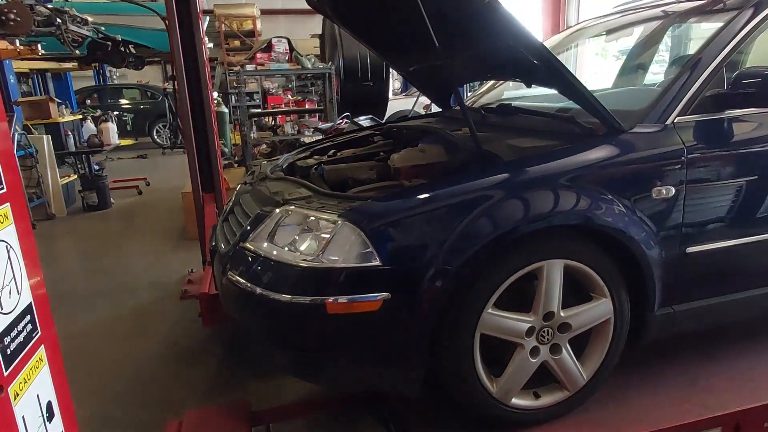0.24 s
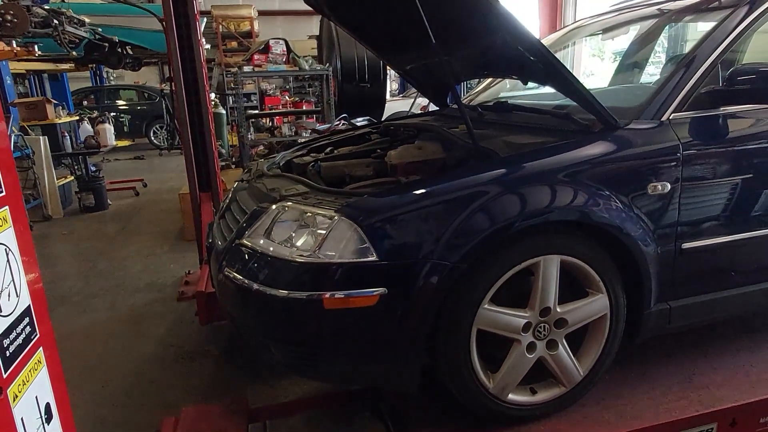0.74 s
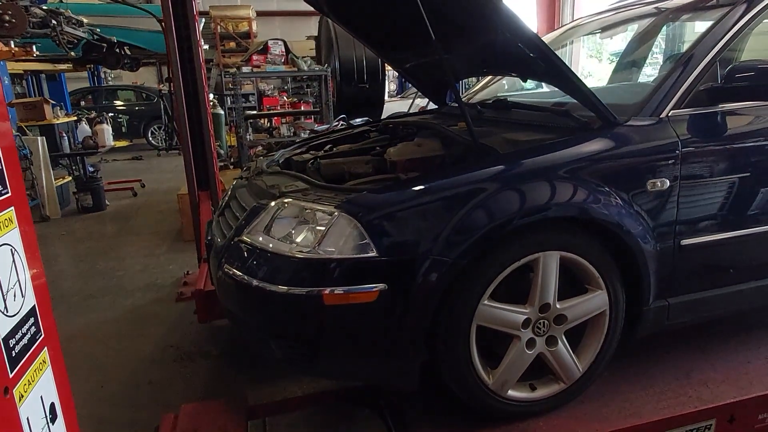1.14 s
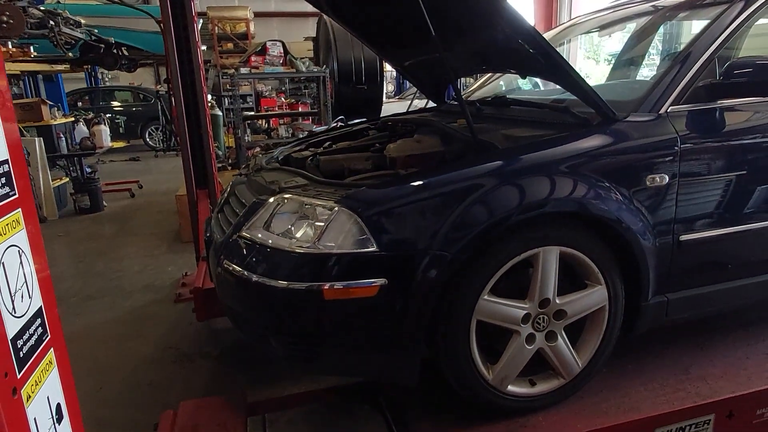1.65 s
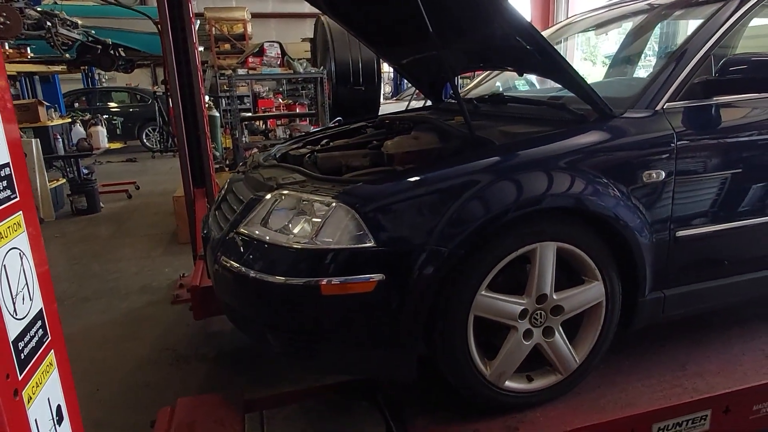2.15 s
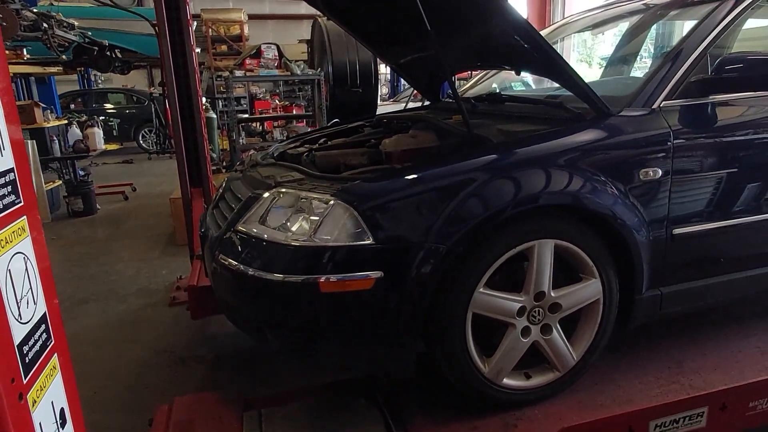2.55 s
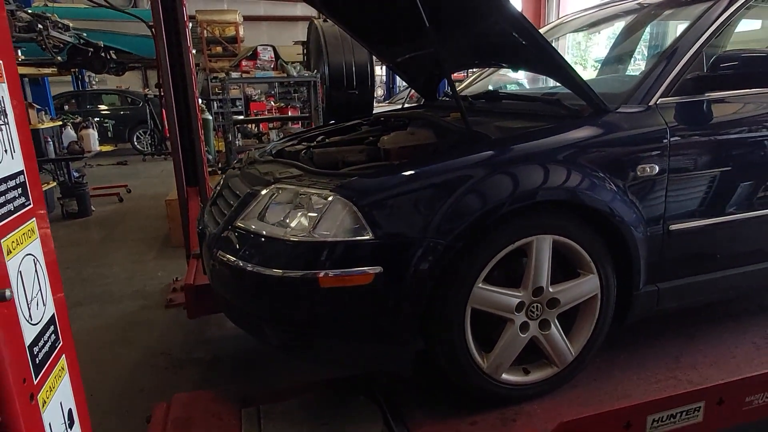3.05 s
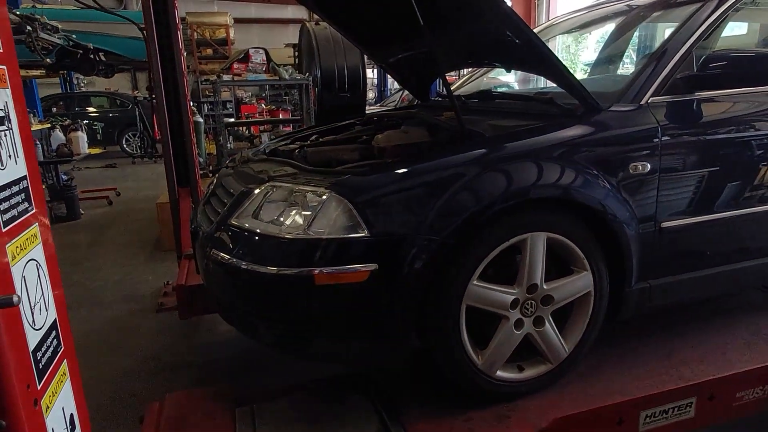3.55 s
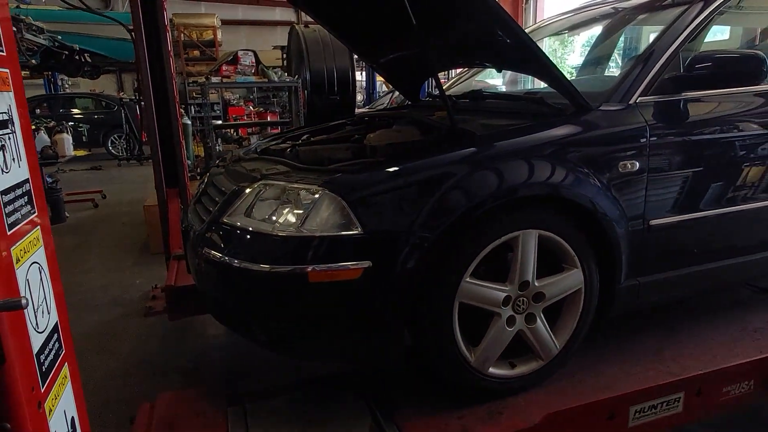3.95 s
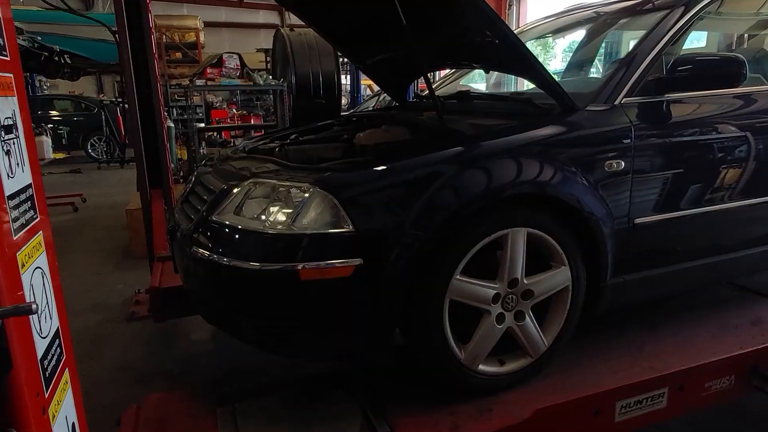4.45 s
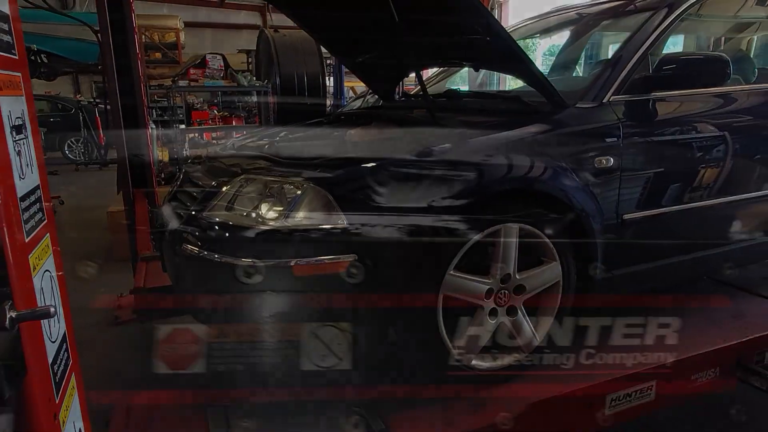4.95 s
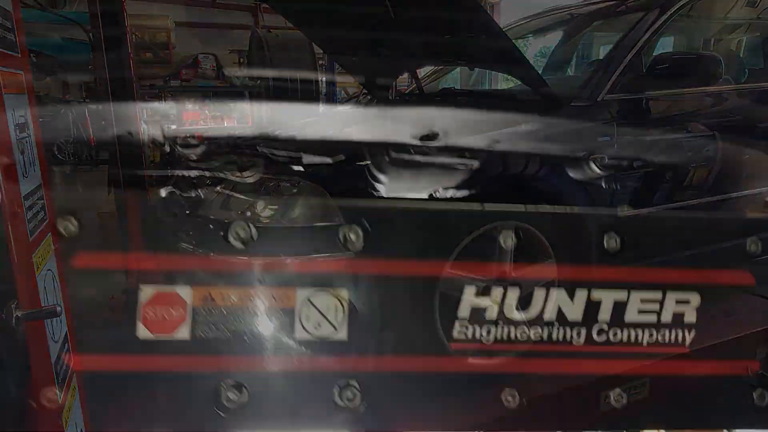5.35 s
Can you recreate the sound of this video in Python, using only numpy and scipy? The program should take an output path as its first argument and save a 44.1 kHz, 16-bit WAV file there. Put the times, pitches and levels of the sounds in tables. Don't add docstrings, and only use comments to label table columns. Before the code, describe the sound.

A loud, piercing hydraulic pump whine holds steady in a garage, then cuts abruptly to faint clicks and soft, low wind-like buffeting.

```python
import sys
import numpy as np
from scipy import signal
from scipy.fft import rfft, irfft, next_fast_len
from scipy.io import wavfile
from scipy.ndimage import map_coordinates

SR = 44100
rng = np.random.default_rng(int(sys.argv[2]) if len(sys.argv) > 2 else 0)


def field_ratio(decibels):
    return 10 ** (np.asarray(decibels, dtype=float) / 20)


def generate_wav(sig):
    pcm = np.round(np.clip(np.atleast_2d(sig).T, -1, 1) * 32767).astype(np.int16)
    wavfile.write(sys.argv[1], SR, pcm)


N = 246519
SIZE = next_fast_len(N)
TEETH = 13
PORT_LEAD_S = 23 / SR
time = np.arange(N) / SR


def curve(table, at=time):
    s, *columns = np.transpose(table)
    return [np.interp(at, s, c) for c in columns]


def band(hz, width_hz):
    f = np.fft.fftfreq(SIZE, 1 / SR)
    near = np.flatnonzero(abs(f - hz) < 4 * width_hz + 1)
    bell = np.exp(-0.5 * ((f[near] - hz) / width_hz) ** 2)
    bins = np.zeros(SIZE, complex)
    bins[near] = bell * np.exp(2j * np.pi * rng.random(len(near)))
    return np.fft.ifft(bins)[:N] * SIZE / np.sqrt(np.sum(abs(bins) ** 2))


def two_ports(table, alike_hz, modes=()):
    f = np.fft.rfftfreq(SIZE, 1 / SR) + 1
    hz, *ports_db = np.transpose(table)
    common, *own = rfft(rng.standard_normal((3, SIZE))) * np.sqrt(SR / 2)
    share = 1 / (1 + (f / alike_hz) ** 2)
    out = []
    for port, db in enumerate(ports_db):
        earlier = np.exp(2j * np.pi * f * PORT_LEAD_S * (1 - port))
        mix = np.sqrt(share) * common * earlier + np.sqrt(1 - share) * own[port]
        colour_db = np.interp(np.log(f), np.log(hz), db)
        for mode_hz, width_hz, *gains_db in modes:
            colour_db = colour_db + gains_db[port] * np.exp(-0.5 * ((f - mode_hz) / width_hz) ** 2)
        out.append(irfft(mix * field_ratio(colour_db), SIZE)[:N])
    return np.array(out)


def tooth_hz():
    final_hz, creep_hz, settle_s = 766.72, 0.52, 2.6
    return final_hz - creep_hz * np.exp(-time / settle_s)


def wander(knots, count, rate_hz):
    slide = rate_hz * rng.standard_normal((2, count)) * knots[:, None, None]
    path = np.exp(2j * np.pi * (slide + rng.random((2, count))))
    return (path[:, 0] + 0.5 * path[:, 1]) / np.sqrt(1 + 0.39 ** 2)


def echo_paths(knots, echoes, depth, spread):
    paths = 1
    for echo, null_s, rate_hz in echoes:
        turns = (knots - null_s) * rate_hz + spread
        paths = paths - np.clip(echo, 0, 1) * depth * np.exp(2j * np.pi * turns)
    return paths


# [multiple, level/dB, platform echo share 0-1, echo cancels t/s, fades f/Hz]
LEFT_PARTIALS = [(1, -39, 0.22, 6.5, 0.193), (2, -44, 0.28, 4.5, 0.288), (3, -44, 1, 2.5, 0.535),
                 (4, -48, 0.57, 2, 0.219), (5, -45.5, 0.56, 5, 0.288), (6, -34.26, 0.98, 0.7, 0.008),
                 (7, -31.45, 1, 0.9, 0.0124), (8, -21.5, 1, 0.74, 0.011), (9, -38, 0.5, -1.34, 0.134),
                 (10, -30.5, 1.0, 5, 0.0254), (11, -52, 1.0, 4.5, 0.251), (12, -43, 0.66, 3, 0.11),
                 (13, -46.5, 0.6, 4, 0.28), (14, -40, 0.64, 2, 0.061), (15, -42.5, 1.0, 2.5, 0.1),
                 (16, -36.5, 0.7, 3, 0.22), (17, -33, 0.48, 1.2, 0.23), (18, -27, 0.93, 0.5, 0.022),
                 (19, -36, 0.2, 2.3, 0.36), (20, -55, 0.77, 4, -0.34)]
# [multiple, level/dB, platform echo share 0-1, echo cancels t/s, fades f/Hz]
RIGHT_PARTIALS = [(1, -40.0, 0.4, -5.5, 0.157), (2, -32.5, 0.47, -1.06, 0.063), (3, -43, 1.0, 9, 0.069),
                  (4, -46, 0.43, 5, -0.39), (5, -43.5, 1, 3, 0.11), (6, -47.5, 0.41, 1, -0.2),
                  (7, -29, 0.66, 1.25, 0.028), (8, -47, 0.72, 1, -0.51), (9, -61, 0.2, 6, 0.67),
                  (10, -51.5, 0.82, 6, -0.36), (11, -52.5, 0.81, 1.9, -0.11), (12, -38, 0.61, -2, 0.154),
                  (13, -44, 0.6, 3, 0.5), (14, -51.22, 0.44, 2, -0.34), (15, -30, 0.84, 3.5, -0.0087),
                  (16, -47.5, 1.0, 3.5, 0.402), (17, -50.32, 0.42, 5, -0.091),
                  (18, -44.5, 0.61, 4.5, -0.31), (19, -32.3, 0.8, 6, -0.0072), (20, -53, 0.83, 3, -0.176)]
# [left share 0-1, cancels t/s, fades f/Hz, right share 0-1, cancels t/s, fades f/Hz]
BODY_ECHO = [(0.27, 3, -0.26, 0.3, 3, -0.27), (0.35, 3, -0.28, 0.53, 4, -0.109),
             (0.84, 1.3, 0.52, 0.28, 0.37, 0.422), (0.23, 2.6, -0.356, 0.54, 3.5, 0.17),
             (0.84, 1.74, -0.15, 0.51, 0.65, 0.239), (0.13, 1.05, -0.232, 0.52, 1.1, 0.24),
             (0.034, -0.2, -0.62, 0.35, 1.64, -0.049), (0.077, 1.36, -0.1, 0.68, 3.5, 0.26),
             (1.0, 3.5, 0.04, 0.91, 3, -0.26), (0.31, 9, 0.093, 0.98, -1.35, -0.327),
             (0.53, 5.5, -0.57, 0.56, 3, 0.361), (0.31, 0.4, -0.48, 0.28, -1.5, -0.543),
             (0.25, 5, 0.72, 0.57, 4.5, -0.5), (0.11, -2, -0.1, 0.48, 5.5, 0.45),
             (0.66, 0.94, -0.26, 0.018, 2.5, -0.4), (0.1, 4.79, -0.486, 0.61, 5.5, -0.23),
             (0.69, 0.7, -0.33, 0.17, 1.31, 0.78), (0.16, 5.5, 0.12, 0.64, 2.5, 0.49),
             (0.66, 3.5, -0.45, 0.08, -0.0, -0.59), (0.4, 4, 0.4, 1.0, 0, 0.343)]
LEAD = [-1, -3.87, 0.59, -3, -2.5, -3.5, -0.6, -1.5, 2.14, -0.2, 0.5, -0.3, 0.36, -1.6, -2.5, -1.6, -4,
        -1.3, -2.5, 0]
# [2 below level/dB, 1 below level/dB, 1 above level/dB, 2 above level/dB]
NEAR_LEFT = [(-59, -55, -88, -56.5), (-68, -58, -51, -51), (-57.7, -64, -53.5, -56.5), (-70, -75, -70, -62),
             (-70, -69, -61, -44), (-79, -83, -66, -65), (-60, -60, -63, -57), (-59, -46, -48, -48.5),
             (-52, -42, -45.5, -58), (-44, -45, -40.5, -43), (-53, -55, -62, -53), (-56, -61, -41, -54.8),
             (-56.8, -52, -50, -48.5), (-63, -62, -60, -51), (-53.7, -45, -49, -51),
             (-46.5, -51, -42.5, -39.5), (-42.5, -52.5, -52, -40), (-51, -55, -54.6, -46.9),
             (-49, -49, -53, -52), (-61.3, -63, -66.9, -63.8)]
# [2 below level/dB, 1 below level/dB, 1 above level/dB, 2 above level/dB]
NEAR_RIGHT = [(-60.9, -66, -85, -58), (-64.8, -67.6, -63, -62), (-52, -50, -43.5, -49),
              (-62.5, -70, -60, -56), (-57, -51, -66, -50), (-76, -69, -60, -60.5), (-60.3, -66, -64, -64),
              (-59, -56, -50.5, -45), (-64.0, -59.9, -51, -66), (-61.4, -54, -55, -56),
              (-54.7, -48, -48, -53), (-41, -43, -55.5, -51.5), (-48, -46, -47, -59),
              (-61, -60.6, -48, -56), (-60, -58, -57, -54), (-57.0, -60, -64, -53),
              (-62.4, -62.6, -66, -49), (-57.8, -56, -60, -49), (-57, -56.7, -59, -55),
              (-57.4, -62, -64.3, -61.0)]
WAVER = [(-0.2, -0.3, -0.4, 5), (1, 6, -2.2, 2.5), (0.6, 3.5, -0.5, 3), (3.2, 0.5, 2.5, -1.2),
         (4.5, 1.2, 3.5, 2.3), (3, 2.8, 1.3, 4.5), (3, 9.5, 1.5, 2.5), (4, 7, 3.5, -0.3), (-2, 2, 0.2, 4.5),
         (6.5, 5, 3.0, 0.5), (2.3, 2, 0.2, 7.5), (-2.5, 8.5, 2.7, -1.5), (1, 2.7, 1, 4), (-2, 4, 1.5, 1),
         (4, 1.5, 4.5, 9), (2, 3.5, 2, 5.5), (3.5, 4, 4, 6), (5, 4.5, -3, 2), (4, 3, 0, 4),
         (-4, -1, 3.2, 3.2)]
# [below left level/dB, below right level/dB, above left level/dB, above right level/dB]
SKIRTS = [(-66.5, -72, -79, -75), (-69, -75, -60.5, -53), (-63, -70, -60, -62), (-61, -66.5, -74, -65),
          (-70, -60, -74.5, -73), (-68, -74.1, -71, -57), (-62, -65, -69, -71), (-58, -65, -63.5, -62),
          (-65.4, -74, -62, -75), (-60.5, -79, -55.5, -66), (-65, -65, -68.5, -72),
          (-69.9, -70.0, -61, -61), (-59.2, -54, -62, -55), (-58, -61, -68, -65.3),
          (-62, -60, -58.5, -62.7), (-55, -62, -58, -71), (-52, -67.7, -49, -68.0),
          (-57.9, -71, -61, -69.1), (-63.4, -68, -73.5, -72.4), (-78.2, -74.4, -77.4, -72.5)]
# [shaft multiple, left level/dB, right level/dB]
PANELS = [(34.0, -65, -57), (36.0, -56, -51.5), (60.0, -60.5, -48.5), (69.8, -69, -55),
          (87.0, -52.5, -50.5), (87.6, -62, -52), (99, -51, -57), (108.6, -51, -51), (116.4, -61, -64.7),
          (133.0, -44.5, -69), (136, -47, -66), (177.0, -50, -54), (184, -53, -55.6), (188.0, -57.1, -67),
          (199, -53.1, -55), (200.0, -56.3, -61), (207, -54.0, -59), (233, -51, -67), (244.0, -56.7, -65.1)]


def shaft_lines(knots, shaft_hz, turn_size, skirt_db=2.0, loose=0.6, scatter_db=0.8):
    away = np.arange(-6, 7)
    distance = abs(away)
    close = distance <= 2
    slip_hz = 120 - 2 * shaft_hz.mean()
    start = np.exp(2j * np.pi * rng.random(len(LEFT_PARTIALS)))
    angle = 2 * np.pi * rng.random()
    lines = np.zeros((2, len(knots), turn_size // 2 + 1), complex)
    for k, skirt in enumerate(SKIRTS):
        order = (k + 1) * TEETH + away
        below_db, above_db = np.reshape(skirt, (2, 2, 1))
        ports_db = np.where(away < 0, below_db, above_db) + skirt_db + scatter_db * rng.standard_normal(TEETH)
        ports_db[:, [4, 5, 7, 8]] = NEAR_LEFT[k], NEAR_RIGHT[k]
        for multiple, *panel_db in PANELS:
            ports_db[:, order == np.round(multiple)] = np.array(panel_db)[:, None]
        share = np.where(distance == 2, np.clip((k + 1) / 15, 0, 0.9), 0)
        beat = np.exp(2j * np.pi * slip_hz * knots * np.sign(away))
        ripple = np.sqrt(1 - share) + np.sqrt(share) * beat
        drift = wander(knots[:, 0], TEETH, rate_hz=0.069)
        steadiness = np.where(close, 1 + loose * drift, drift)
        side = ripple * steadiness * np.exp(1j * away * angle) * start[k]
        scatter = 0.8j * ~close * rng.standard_normal(TEETH)
        lead = np.exp(2j * np.pi * away * shaft_hz[0] * PORT_LEAD_S + scatter)
        depth = np.where(away == 0, 1, np.clip((k + 1) / 8.64, 0, 1))
        spread = np.where(close, 0.025, 0.059) * away
        for port, partial in enumerate((LEFT_PARTIALS[k], RIGHT_PARTIALS[k])):
            _, level_db, *platform = partial
            body = np.reshape(BODY_ECHO[k], (2, 3))[port]
            paths = echo_paths(knots, (platform, body), depth, spread)
            first, second = np.reshape(WAVER[k], (2, 2))[port]
            waver = np.exp(0.5j * np.where(distance == 1, first, second) * close)
            faded = side * paths
            faded = waver * faded / np.sqrt(np.mean(abs(faded) ** 2, axis=0))
            later = np.exp(-1j * port * LEAD[k])
            lines[port][:, order] = field_ratio(ports_db[port]) * faded * lead ** -port * later
            lines[port][:, order[6]] = field_ratio(level_db) * paths[:, 6] * start[k] * later
    return lines


# [t/s, extra level/dB at the top multiples]
FACING = [
    (0, -2.5),
    (.7, -0.5),
    (1.4, 2),
    (2.1, -1),
    (2.9, -0.5),
    (3.6, 1),
    (4.3, -0.5),
    (5.3, -0.5),
]


def whine(shake_s=3e-6, shake_hz=39.2, flutter_db=-18.0, flutter_hz=121.4):
    knot_s, turn_size = 0.04, 8192
    knots = np.arange(0, N / SR + 2 * knot_s, knot_s)[:, None]
    shaft_hz = tooth_hz() / TEETH
    lines = shaft_lines(knots, shaft_hz, turn_size)
    height = np.arange(lines.shape[2]) / (TEETH * len(LEFT_PARTIALS))
    lines *= field_ratio(curve(FACING, knots)[0] * np.minimum(height, 1))
    shapes = irfft(lines, turn_size, axis=2) * turn_size / np.sqrt(2)
    shapes = np.concatenate([shapes, shapes[:, :, :1]], axis=2)
    turns = np.cumsum(shaft_hz) / SR + shake_s * shaft_hz * band(0, shake_hz).real
    where = [time / knot_s, turns % 1 * turn_size]
    flutter = 1 + field_ratio(flutter_db) * band(0, flutter_hz).real
    return flutter * np.array([map_coordinates(s, where, order=1) for s in shapes])


# [t/s, load 0-1]
LOAD = [
    (0, 0.2),
    (1, 0.04),
    (2.5, 0.09),
    (3.5, 0.43),
    (4.3, 0.57),
    (5.3, 0.93),
]


def steady_tones(table):
    slow, load = time[::64], curve(LOAD)[0]
    out = np.zeros((2, N))
    for hz, left_db, right_db, wobble_hz, swell_db in table:
        offsets_hz, phases = rng.standard_normal(12) * wobble_hz, rng.random(12)
        drift = np.exp(2j * np.pi * (np.outer(slow, offsets_hz) + phases)).sum(axis=1) / np.sqrt(12)
        drift = drift / abs(drift) ** np.clip(1 - wobble_hz / 2.4, 0, 1)
        tone = np.exp(2j * np.pi * hz * time) * np.interp(time, slow, drift) * field_ratio(swell_db * load)
        left = tone * np.exp(1j * np.pi * hz * PORT_LEAD_S)
        out += np.sqrt(2) * np.array([field_ratio(left_db) * left.real, field_ratio(right_db) * tone.real])
    return out


# [f/Hz, left level/dB, right level/dB, wobble f/Hz, full-load swell level/dB]
WINDINGS = [(120, -51.5, -57, 0.16, 14.5), (182.2, -52.5, -55, .6, 5.5), (239.7, -45.5, -47, 0.08, 1.5),
            (300, -51.5, -50, 2.5, 5.5), (360.9, -42, -40, 0.15, 2), (418, -51, -50.5, 1.8, -7),
            (478, -63.5, -62.5, 0.4, 10), (600, -49.5, -57, 0.13, 8.5), (719, -50, -52, .1, 2),
            (870, -66, -64, 0.19, -4), (950, -66, -62, 0.13, 4), (1433, -61, -54.5, 0.21, -2),
            (1559, -58, -55, 0.214, 11)]


def windings():
    return steady_tones(WINDINGS)


# [f/Hz, left level/dB, right
# level/dB, wobble f/Hz, full-load swell level/dB]
MACHINES = [(28, -61, -59, .3, 1), (56.2, -62, -62, 2.4, -2), (85.1, -55, -56, 1.2, -10),
            (97, -56, -59, 2, 4.5), (145, -57.5, -60, 1.93, 7), (283, -52.5, -53.5, 5.1, -7),
            (328.7, -50.5, -54, 5.2, -6), (347, -45.5, -46, 1.205, -15), (355.7, -49.5, -46.5, 0.265, 5.5),
            (540, -73, -79, .4, -3), (648, -59, -60, 1.49, 6), (650, -62, -74, 0.38, 1),
            (876, -66, -57, 1.13, -4)]


def machines():
    return steady_tones(MACHINES)


# [f/Hz, left level/dB per Hz, right level/dB per Hz]
RUSH = [(25, -88, -82), (55.3, -72, -70), (200, -68.5, -68.5), (483, -77, -73), (1140, -80.5, -79),
        (2120, -80.5, -77.5), (6500, -80.5, -78.5), (9400, -79.5, -82.5)]
# [f/Hz, width f/Hz, left level/dB, right level/dB]
CASING = [(365, 33, 3, -1.5), (890, 81, -3, 4.5), (2280, 480, -6.5, 1.5), (2540, 86, 12.5, 9),
          (4800, 130, -15, -15), (3200, 300, -0.5, -3.5), (4540, 140, -1, -3.5), (1170, 93, -1, -1.5),
          (3900, 140, 2.5, -0.5), (6060, 240, 2, 2), (7200, 98, -7, -9), (8300, 630, 3.5, 2.5),
          (8770, 130, -8, -7), (13000, 1200, 6, -9), (14150, 150, -4, -4), (15050, 150, -3, -1),
          (15900, 1000, -10, -10)]


def rush():
    start_db, growth_db_per_s, throb_db = -1.9, 0.63, 0.78
    turns = np.cumsum(tooth_hz()) / TEETH / SR
    level_db = start_db + growth_db_per_s * time + throb_db * np.cos(2 * np.pi * turns)
    return two_ports(RUSH, 1280, CASING) * field_ratio(level_db)


# [t/s, peak level/dB]
SURGES = [(.11, -47), (.43, -45.5), (.87, -43.5), (1.1, -41.5), (1.51, -48), (1.73, -56), (1.93, -38.5),
          (2.37, -44), (2.57, -43), (2.85, -51), (3.66, -48), (4.08, -45), (4.3, -44), (4.65, -58),
          (4.95, -46), (5.15, -47)]


def compressor():
    rise_s, fall_s, rest_db = 0.035, 0.09, -63
    note = band(168.6, 3)
    swell = field_ratio(rest_db)
    for s, peak_db in SURGES:
        rise, fall = ((s - time) / rise_s) ** 2, (time - s) / fall_s
        swell = swell + field_ratio(peak_db) * np.exp(-np.where(time < s, rise, fall))
    return np.sqrt(2) * (note / abs(note)).real * swell


# [t/s, left level/dB, right level/dB, half length t/s]
GUSTS = [
    (5.255, -42, -47, .008),
    (5.34, -39, -50, 0.032),
    (5.45, -34, -31.5, 0.025),
    (5.505, -39, -37, 0.031),
]


def buffets():
    calm_db, centre_hz, width_hz = -51, 68, 50
    power = field_ratio(calm_db) ** 2
    for s, left_db, right_db, half_s in GUSTS:
        power = power + field_ratio([[left_db], [right_db]]) ** 2 * np.exp(-((time - s) / half_s) ** 2)
    air = np.array([band(centre_hz, width_hz) for _ in range(2)])
    return np.sqrt(2) * (air / abs(air) ** 0.56).real * np.sqrt(power)


# [f/Hz, left level/dB per Hz, right level/dB per Hz]
SHOP = [(149, -69, -72), (400, -78, -79), (1100, -86, -83.5), (2220, -86.5, -84), (4900, -91.5, -99),
        (6460, -99, -99), (13700, -99, -101), (15300, -118, -114)]


def distant_shop():
    peak_s, peak_db, half_s = 5.412, 2, 0.16
    return two_ports(SHOP, 400) * field_ratio(peak_db - 6.9 * ((time - peak_s) / half_s) ** 2)


# [t/s, peak level/dB, f/Hz, width f/Hz, ring t/s]
TICKS = [
    (5.2495, -44, 2300, 400., 0.0022),
    (5.254, -44, 2530, 248, 0.0058),
    (5.2765, -44, 2100, 400., .002),
    (5.2892, -36, 3200, 1500., .001),
    (5.293, -42, 2100, 500., .002),
    (5.299, -51, 4000, 600., .0015),
]


def ticks():
    out = np.zeros(N)
    for s, peak_db, hz, width_hz, ring_s in TICKS:
        decay = (time > s) * np.exp(-np.maximum(time - s, 0) / ring_s)
        out += field_ratio(peak_db) * band(hz, width_hz).real * decay
    return out


def scene():
    change_s, fade_s = 5.2408, 0.0011
    running = np.clip((change_s - time) / fade_s + 0.5, 0, 1)
    pump = whine() + windings() + machines() + rush() + compressor()
    quiet = buffets() + distant_shop() + ticks()
    return running * pump + (1 - running) * quiet


def band_limit(x):
    return signal.sosfilt(signal.butter(12, 15750, fs=SR, output="sos"), x)


def record(dry):
    return band_limit(dry)


dry = scene()
out = record(dry)
generate_wav(out)
```